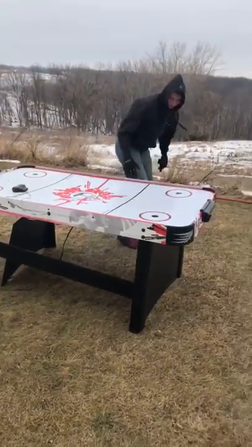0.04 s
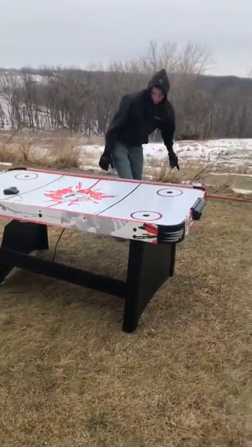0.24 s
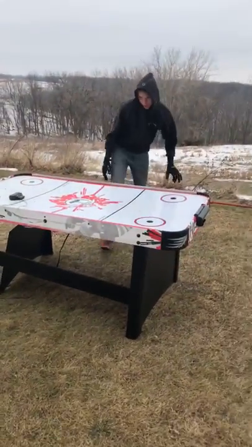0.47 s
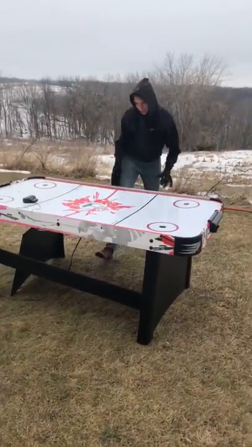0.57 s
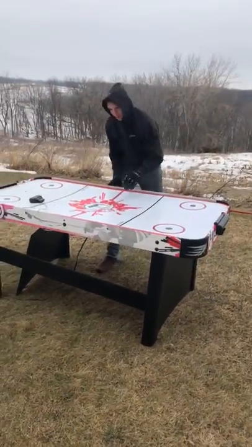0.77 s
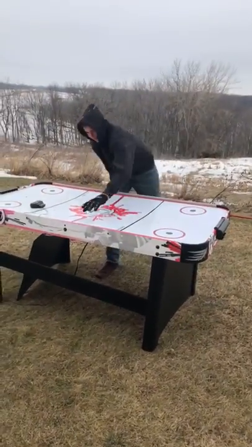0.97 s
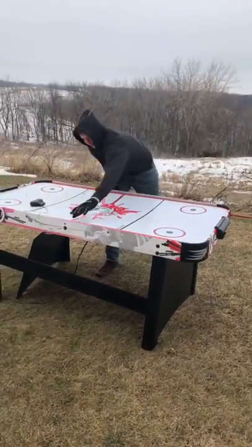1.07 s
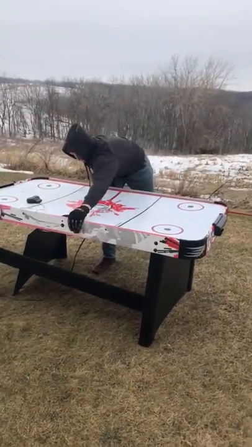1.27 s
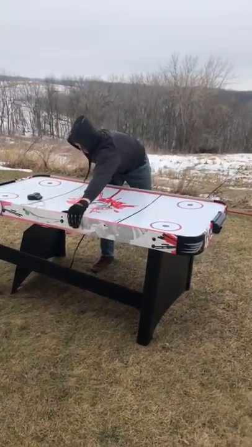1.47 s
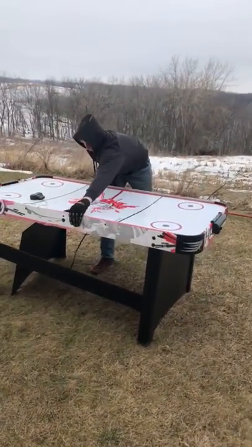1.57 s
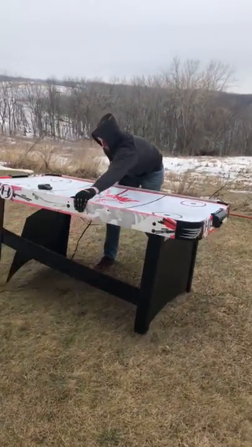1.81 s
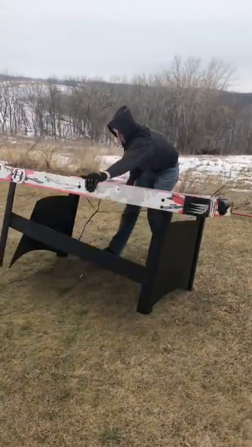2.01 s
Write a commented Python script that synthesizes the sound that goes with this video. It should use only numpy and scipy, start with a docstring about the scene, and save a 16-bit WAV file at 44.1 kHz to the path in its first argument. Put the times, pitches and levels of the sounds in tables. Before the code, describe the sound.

A hollow games table is tipped outdoors with one sharp knock. First, wind buffets the microphone with rumble and low thumps, strongest around 0.4 to 0.7 seconds. Clothes and dry grass rustle faintly, and the table creaks briefly at 1.5 seconds. The knock lands at about 1.75 seconds, followed by a quick rattle of panels. A loose plastic piece slides over the top and clacks near 2 seconds.

```python
"""On a lawn, one microphone out in the wind, close to a hollow games table being grabbed and tipped.
Clothes and dry grass rustle and the frame creaks under the grip. The table takes the load with one
sharp knock, its panels rattle and its top rings; a loose plastic piece slides over the top and clacks.
Gusts buffet the microphone with rumble and low thumps, over a faint hiss of open air."""
import sys
import numpy as np
from scipy import signal
from scipy.fft import rfft, irfft, next_fast_len
from scipy.io import wavfile
from scipy.ndimage import uniform_filter1d, minimum_filter1d

SR = 44100
rng = np.random.default_rng(int(sys.argv[2]) if len(sys.argv) > 2 else 0)


def dump(signal):
    """Clip the signal to [-1, 1] and save it as 16-bit WAV at the path in sys.argv[1]."""
    limited = np.clip(np.atleast_2d(signal).T, -1, 1)
    pcm = np.round(limited * 32767).astype(np.int16)
    wavfile.write(sys.argv[1], SR, pcm)


N = 90404
TIME = np.arange(N) / SR


def from_db(db):
    """Decibels to gain."""
    return 10 ** (np.asarray(db) / 20)


def rms_one(x):
    """Scale to rms 1."""
    return x / np.sqrt(np.mean(x ** 2) + 1e-20)


def at_hz(points, hz):
    """Read a table on a log-frequency axis."""
    freqs, values = np.transpose(points)
    return np.interp(np.log(hz), np.log(freqs), values)


def cut(x, hz, kind="low", order=2):
    """Butterworth low- or high-pass."""
    sos = signal.butter(order, np.clip(hz, 10, .45 * SR), kind, fs=SR, output="sos")
    return signal.sosfilt(sos, x + 1e-18)


def bands(spectrum, size):
    """Noise of a given spectrum in third octaves, together of rms 1: (centres in Hz, noises)."""
    edges = 16 * 2 ** (np.arange(31) / 3)
    centres = np.sqrt(edges[1:] * edges[:-1])
    freq = np.arange(size // 2 + 1) * SR / size + 1e-3
    white = rfft(rng.standard_normal(size))
    octaves_outside = np.maximum(np.log2(spectrum[0][0] / freq), np.log2(freq / spectrum[-1][0]))
    colour = from_db(at_hz(spectrum, freq) - 20 * np.maximum(octaves_outside, 0))
    in_band = (freq >= edges[:-1, None]) & (freq < edges[1:, None])
    noises = irfft(white * colour * in_band, size)
    return centres, noises / np.std(noises.sum(0))


def noise(spectrum):
    """Steady noise of one colour, rms 1."""
    return bands(spectrum, size=next_fast_len(N))[1].sum(0)[:N]


def flutter(hz, size=N, order=2):
    """Random motion below a frequency, rms 1."""
    return rms_one(cut(rng.standard_normal(size), hz, order=order))


def add(out, s, sound):
    """Mix a sound in at a time in seconds."""
    i = int(np.clip(s * SR, 0, N - 1))
    out[i:i + len(sound)] += sound[:N - i]


def blow(crack_db, panel_db, top_db, contact_hz, size=16384):
    """One contact on the table: a brief crack, crowded panel modes and the clear ring of the top."""
    # Each row of both spectra: frequency in Hz, relative level in dB per Hz.
    crack_spectrum = [(200, -19), (600, -12), (1150, 1.5), (1600, 5), (2100, -2.5), (2850, 1.5),
                      (4300, -18.5), (5400, -7.5), (6700, -32), (9000, -20), (10500, -43), (13000, -29),
                      (15000, -45)]
    panel_spectrum = [(120, -31), (200, 0), (360, 1), (560, 1.5), (800, 2.5), (1600, -3.5), (2700, -3),
                      (3800, -17), (5500, -24.5), (7000, -32.5), (14000, -35)]
    # Decay of the panels. Each row: frequency in Hz, seconds to fall 60 dB.
    panel_t60 = [(250, 0.33), (600, 0.25), (1500, 0.14), (3000, 0.14), (6000, 0.23), (14000, 0.33)]
    # Modes of the hollow top. Each row: frequency in Hz, relative level in dB, seconds to fall 60 dB.
    top_modes = [(245, -22, .26), (280, -18.5, .24), (345, -14, .16), (380, -14, .15), (534, -10.5, .21),
                 (590, -22, .15), (706, -21, .18), (846, -25, .16), (887, -23, .18), (1103, -20, .12),
                 (1310, -22, .11), (1395, -20, .11), (1571, -19, .1), (1665, -19, .07), (1840, -25, .11),
                 (1966, -26, .12), (2390, -21, .11), (3016, -27, .12), (3878, -32, .11)]
    crack_t60_s, mode_trim_db, mode_scatter_db = 0.055, -2, 1.5
    panel_rise_cycles, top_rise_cycles = 0.6, 4.2  # the whole top swings up more slowly
    t = np.arange(size) / SR
    crack = bands(crack_spectrum, size)[1].sum(0) * from_db(-60 * t / crack_t60_s)
    centres, noises = bands(panel_spectrum, size)
    panel_rise = 1 - np.exp(-t * centres[:, None] / panel_rise_cycles)
    panel = (noises * panel_rise * from_db(-60 * t / at_hz(panel_t60, centres[:, None]))).sum(0)
    top = np.zeros(size)
    for k, (hz, db, t60) in enumerate(top_modes):
        decay = from_db(db + mode_trim_db + mode_scatter_db * rng.standard_normal() - 60 * t / t60)
        rise = 1 - np.exp(-t * hz / top_rise_cycles)
        top += (-1) ** k * decay * rise * np.sin(2 * np.pi * hz * t)
    return cut(from_db(crack_db) * crack + from_db(panel_db) * panel + from_db(top_db) * top, contact_hz)


def knocks():
    """The table takes the load, its joints settle, and the top answers the loose piece."""
    # Each row: start in seconds, gains of crack, panels and top in dB, contact cut-off in Hz.
    blows = [(1.7560, -24, -23.5, -38, 3500), (1.7585, -12.5, -17, -0.5, 13600),
             (1.7630, -17, -23, -12, 2020), (1.7735, -22, -26, -28, 800), (1.7857, -21.5, -32, -31, 2950),
             (1.8025, -53, -25, -38, 900), (1.872, -45, -28, 0.5, 166), (1.9960, -48, -43, -26, 770)]
    out = np.zeros(N)
    for s, crack_db, panel_db, top_db, contact_hz in blows:
        add(out, s, blow(crack_db, panel_db, top_db, contact_hz))
    return out


def snaps():
    """Hard edges ring for a few milliseconds as they strike."""
    # Each row: frequency in Hz, relative level in dB, seconds to fall 60 dB.
    edge_modes = [(1700, -19, .012), (5150, -11, .005), (5750, -11, .005), (8900, -19, .005),
                  (11800, -24, .004), (14400, -32, .003)]
    # Each row: start in seconds, gain in dB.
    strikes = [(1.4290, -41), (1.7587, -6.5), (1.9945, -25.5), (1.997, -26)]
    out, t = np.zeros(N), np.arange(2048) / SR
    ring = sum(from_db(db - 60 * t / t60) * np.sin(2 * np.pi * hz * t) for hz, db, t60 in edge_modes)
    for s, db in strikes:
        add(out, s, from_db(db) * ring)
    return out


def rattles(scatter_db=5.5):
    """Quick uneven runs of light contacts, as gloves take hold and as the panels rattle."""
    # Each row: start and end in seconds, contacts per second, panel gain in dB,
    # crack in dB relative to the panels, gain of the top in dB, contact cut-off in Hz.
    runs = [(1.635, 1.666, 160, -38, 6, -29, 760), (1.839, 1.867, 220, -33, -7, -19.5, 2706)]
    out = np.zeros(N)
    for start, end, rate, panel_db, crack_db, top_db, contact_hz in runs:
        for s in np.arange(start, end, 1 / rate):
            strength = from_db(scatter_db * rng.standard_normal())
            late_s = .5 * rng.random() / rate
            add(out, s + late_s, strength * blow(panel_db + crack_db, panel_db, top_db, contact_hz))
    return out


def slide(start_s=1.76, rise_s=0.019, level_db=-39.5, chatter_hz=112.2, chatter_depth=0.35):
    """Plastic skates over the tilted top, hissing with a fast, uneven chatter."""
    # Each row: frequency in Hz, relative level in dB per Hz.
    spectrum = [(150, -45), (262, 12.5), (480, -13.5), (1050, -5.5), (1500, -9), (2500, -2.5),
                (3100, -13.5), (4000, -21.5), (8000, -26.5), (14000, -29.5)]
    speed = 1 + 0.18 * flutter(hz=40)
    chatter = 1 + chatter_depth * np.sin(2 * np.pi * chatter_hz * np.cumsum(speed) / SR)
    onset = np.clip((TIME - start_s) / rise_s, 0, 1)
    return from_db(level_db) * onset * chatter * noise(spectrum)


def clacks(size=8192):
    """The loose piece strikes and bounces: dry plastic contacts whose treble dies first."""
    # Each row: start in seconds, level in dB.
    contacts = [(1.9950, -26.5), (1.997, -26)]
    # Each row: frequency in Hz, relative level in dB per Hz.
    spectrum = [(200, 8), (330, -4), (600, 1.5), (1080, 4.5), (1500, -13), (1950, 10.5), (2250, -5),
                (2600, 4), (4500, -12), (5800, -14), (7000, -13.5), (15000, -27)]
    # Each row: frequency in Hz, seconds to fall 60 dB.
    t60 = [(300, .15), (1000, .08), (2500, .03), (12000, .024)]
    out, t = np.zeros(N), np.arange(size) / SR
    for s, db in contacts:
        hz, noises = bands(spectrum, size)
        decay = from_db(db - 60 * t / at_hz(t60, hz[:, None]))
        add(out, s, (noises * decay).sum(0))
    return out


def wind(evenness=0.44, reference_db=-18.5, brighten_above_hz=71, brighten_per_octave=0.3):
    """Turbulence on the microphone: a stronger gust is louder and brighter."""
    # Strength of the wind. Each row: time in seconds, rumble gain in dB.
    gusts = [(0, -23), (.11, -22), (.16, -26.5), (.21, -19.5), (.26, -23), (.30, -28), (.40, -15.5),
             (.49, -15.5), (.595, -22), (.645, -12.5), (.69, -17.5), (.775, -18), (.83, -28), (.94, -26.5),
             (1.04, -16), (1.09, -24), (1.125, -33.5), (1.33, -26.5), (1.45, -33.5), (1.50, -18),
             (1.56, -18.5), (1.68, -23), (1.73, -27.5), (1.89, -32.5), (2.05, -35)]
    # Rumble at the reference strength. Each row: frequency in Hz, relative level in dB per Hz.
    spectrum = [(18, -34.5), (30, 2.5), (75, 0.5), (140, -4.5), (230, -14), (350, -24.5), (550, -36),
                (1000, -51), (1800, -70)]
    gust_db = np.interp(TIME, *np.transpose(gusts))
    hz, noises = bands(spectrum, size=next_fast_len(N))
    noises = noises[:, :N]
    octaves = np.clip(np.log2(hz / brighten_above_hz), 0, 3.0)[:, None]
    brightening_db = brighten_per_octave * octaves * (gust_db - reference_db)
    rumble = (noises * from_db(gust_db + brightening_db)).sum(0)
    swell = np.sqrt(uniform_filter1d(noises.sum(0) ** 2, size=1400) + 1e-9)
    return rumble / uniform_filter1d(swell, size=700) ** evenness  # partly evens out chance swells


def eddies(slowing_per_cycle=0.55, peak_cycles=0.92, onset_power=2.05):
    """Each eddy hits the microphone as two or three slowing pressure cycles with a turbulent front."""
    # Each row: start in seconds, envelope peak in dB, starting pitch in Hz.
    hits = [(0.191, -26.5, 470), (0.388, -18.5, 381), (.405, -15, 260), (0.421, -20, 417), (.450, -22, 544),
            (0.464, -11, 494), (.465, -8, 119), (0.486, -6.5, 392), (0.486, -8, 113), (0.53, -24, 854),
            (.526, -12.5, 120), (0.562, -15, 423), (0.605, -14, 270), (0.617, -7.5, 372), (0.625, -4, 316),
            (.633, -12.5, 673), (.638, -9, 387), (.636, -6.5, 98.6), (.683, -11.5, 334), (.691, -18.5, 452),
            (0.748, -19, 420), (0.761, -13, 282), (0.815, -27, 332), (0.961, -21.5, 298),
            (0.974, -18.5, 470), (.990, -18, 210), (1.024, -7, 246), (1.081, -16, 213), (1.085, -16.5, 147),
            (1.328, -28.5, 325), (1.372, -23.5, 248), (1.473, -18, 227), (1.520, -13, 319),
            (1.541, -12.5, 159), (1.571, -20.5, 530), (1.613, -9.5, 478), (1.620, -16.5, 120),
            (1.661, -24, 400), (1.931, -23, 53.6)]
    fray_db, fray_peak_cycles, fray_cutoff_ratio = -16, 0.76, 1.414  # fine turbulence at the front
    out, t = np.zeros(N), np.arange(20000) / SR
    for s, db, hz in hits:
        cycles = np.log1p(slowing_per_cycle * hz * t) / slowing_per_cycle
        age, front = cycles / peak_cycles, cycles / fray_peak_cycles
        swing = age ** onset_power * np.exp(onset_power * (1 - age)) * np.sin(2 * np.pi * cycles)
        fray = flutter(fray_cutoff_ratio * hz, len(t), order=5) * (front * np.exp(1 - front)) ** 2
        add(out, s, from_db(db) * (swing + from_db(fray_db) * fray))
    return out


def creak(middle_s=1.501, half_s=.015, hz=922, width_hz=75, level_db=-41.5):
    """Friction under the grip excites one resonance of the frame."""
    rub = signal.lfilter(*signal.iirpeak(hz, hz / width_hz, fs=SR), rng.standard_normal(N))
    swell = np.exp(-.5 * ((TIME - middle_s) / half_s) ** 4)
    return from_db(level_db) * swell * rms_one(rub)


def rustles(grain_db=1.5, treble_hz=3510, attack_s=.003, release_s=.007):
    """Short grainy strokes of cloth and dry grass."""
    # Each row: start and length in seconds, level in dB, extra treble gain in dB.
    strokes = [(0.49, 0.043, -70, 16.5), (0.632, 0.045, -66, 14), (0.731, 0.097, -59.5, -4),
               (0.852, 0.38, -61, -2.5), (0.995, 0.0081, -50, -1), (1.012, 0.062, -64, 12),
               (1.09, 0.011, -55, -16), (1.18, 0.047, -53.5, -3.5), (1.2405, 0.011, -45.5, -6),
               (1.428, 0.0072, -51.5, 3), (1.471, 0.028, -48, -4.5), (1.515, 0.042, -53.5, 1),
               (1.569, 0.0058, -44.5, -0.5), (1.583, 0.024, -52, -0.5), (1.634, 0.0074, -46, -12),
               (1.649, 0.056, -56.5, 1), (1.709, 0.0056, -47.5, -7), (1.725, 0.022, -48.5, -10)]
    # Each row: frequency in Hz, relative level in dB per Hz.
    spectrum = [(300, -8.5), (700, 1), (1000, -1.5), (1500, -6.5), (2400, -3), (3600, -14.5), (7000, -21),
                (15000, -25)]
    grains = rms_one(noise(spectrum) * from_db(grain_db * flutter(hz=400)))
    low, high = cut(grains, treble_hz, order=3), cut(grains, treble_hz, "high", order=3)
    out = np.zeros(N)
    for s, length, db, treble_db in strokes:
        attack = np.clip((TIME - s) / attack_s, 0, 1)
        release = np.exp(-np.maximum(TIME - s - length, 0) / release_s)
        out += from_db(db) * attack * release * (low + from_db(treble_db) * high)
    return out


def squeak(middle_s=.08, half_s=.012, pitch_hz=2540, glide_hz_per_s=-2000, level_db=-56, octave_db=-17):
    """One faint, rough, falling whistle with a weak octave."""
    hz = pitch_hz + glide_hz_per_s * (TIME - middle_s) + 170 * flutter(hz=300)
    phase = 2 * np.pi * np.cumsum(hz) / SR
    swell = np.exp(-.5 * ((TIME - middle_s) / half_s) ** 2)
    return from_db(level_db) * swell * (np.sin(phase) + from_db(octave_db) * np.sin(2 * phase))


def open_air(level_db=-60.3):
    """The steady, faint hiss of the air over the lawn."""
    # Each row: frequency in Hz, relative level in dB per Hz.
    spectrum = [(100, 6), (500, 1), (1200, -3), (2500, -4.5), (4000, -12), (8000, -18), (15000, -23)]
    return from_db(level_db) * noise(spectrum)


def scene():
    """Wind, open air and the table, heard in mono from one spot on the lawn."""
    outdoors = wind() + eddies() + open_air()
    handling = rustles() + creak() + slide() + clacks() + snaps() + knocks() + rattles()
    return (outdoors + handling + squeak())[None]


def record(dry, microphone_edge_hz=13800, ceiling=.97, cutoff_hz=16200):
    """The microphone rolls off the top octave; the strongest peaks are limited, the very top is cut."""
    heard = cut(dry, microphone_edge_hz, order=3)
    held_gain = minimum_filter1d(np.minimum(1, ceiling / (np.abs(heard) + 1e-9)), size=441)
    limited = heard * uniform_filter1d(uniform_filter1d(held_gain, size=220), size=220)
    return signal.sosfilt(signal.ellip(10, .2, 80, cutoff_hz, fs=SR, output="sos"), limited)


dry = scene()
out = record(dry)
dump(out)
```